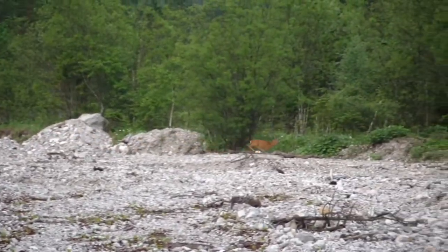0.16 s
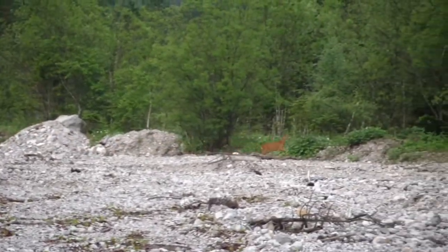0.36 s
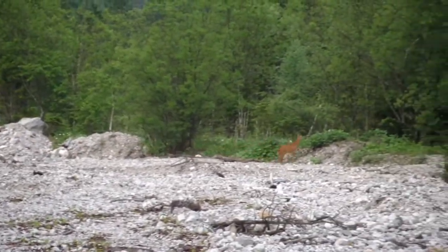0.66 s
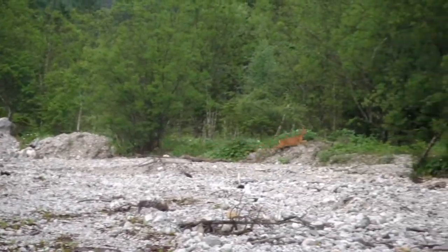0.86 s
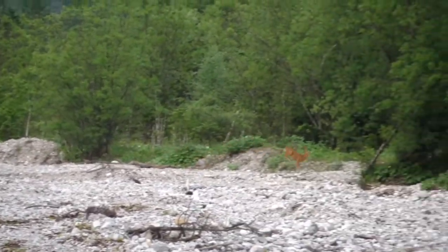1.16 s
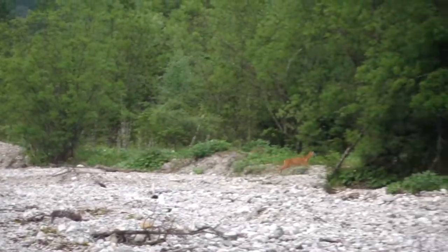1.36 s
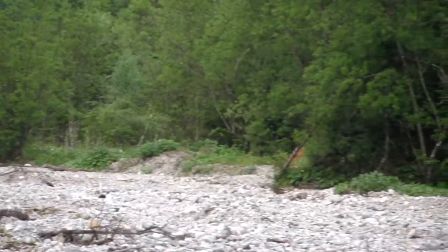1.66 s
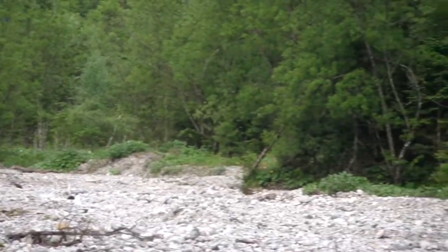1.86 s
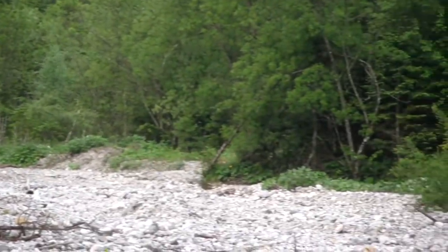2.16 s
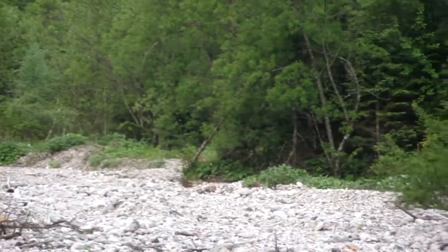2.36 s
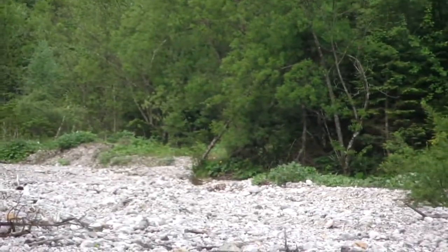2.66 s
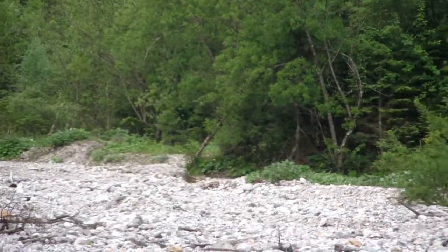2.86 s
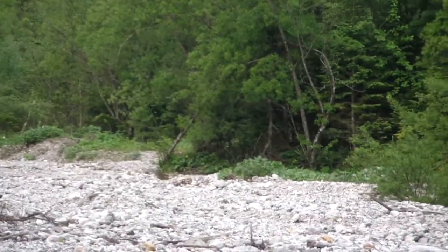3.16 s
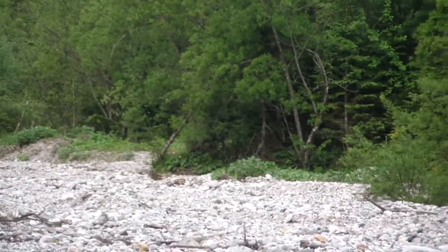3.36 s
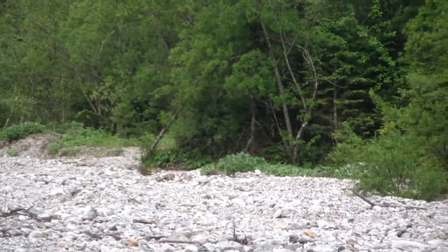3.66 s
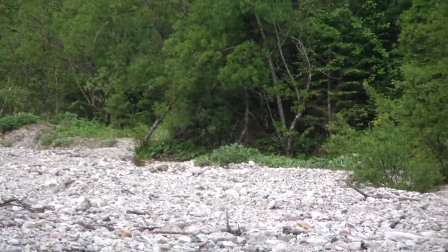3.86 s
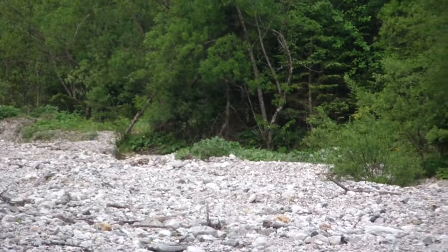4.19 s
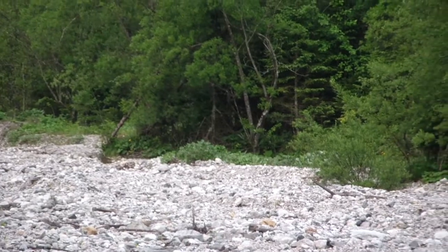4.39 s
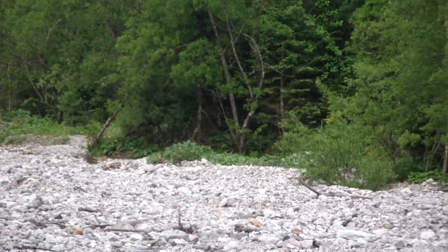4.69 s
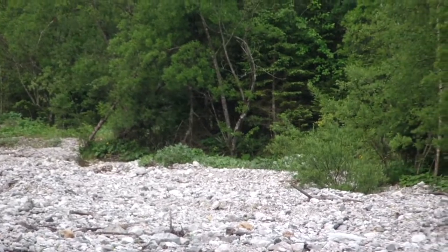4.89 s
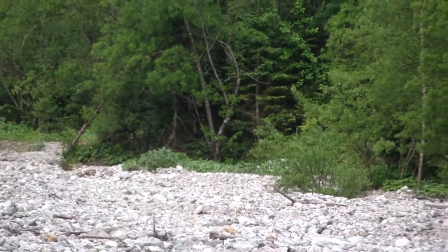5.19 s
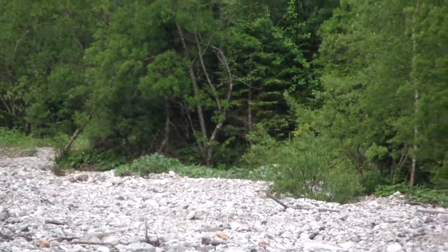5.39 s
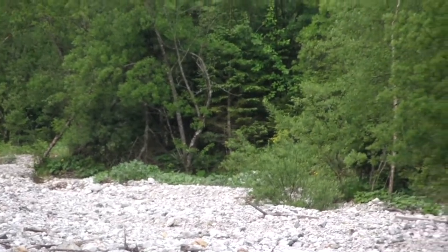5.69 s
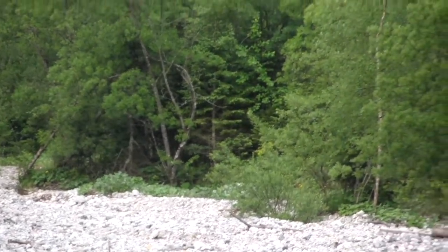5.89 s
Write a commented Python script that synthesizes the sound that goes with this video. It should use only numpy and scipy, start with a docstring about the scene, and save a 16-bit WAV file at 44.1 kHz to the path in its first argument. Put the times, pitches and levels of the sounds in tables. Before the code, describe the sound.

Outdoors by a mountain forest, a deer barks hoarsely seven times, each short cry ringing among trunks and echoing from a slope about a quarter second later. A far songbird whistles, busiest in the middle. Close to the microphone, stones tick and knock underfoot, with one very loud clack near the end. Faint airy hiss and a thin electronic whine lie beneath.

```python
"""The first of seven hoarse alarm barks: a deer flees across a gravel river bed into the forest.
Irregular vocal-fold beats and noise ring three throat resonances; noise reflections make trees and a slope's echo.
A songbird of gliding tones sings far off; close by, damped modes and bursts of grit make stones knock underfoot.
Under them lie shaped noise, a faint rush of air and hiss, and the camera's thin whine, with one soft bump."""
import sys
import numpy as np
from scipy import signal
from scipy.io import wavfile
from scipy.ndimage import uniform_filter1d

SR = 44100
rng = np.random.default_rng(int(sys.argv[2]) if len(sys.argv) > 2 else 0)


def int16_out(signal):
    """Quantize to a 16-bit WAV file."""
    q = np.round(np.clip(np.atleast_2d(signal).T, -1, 1) * 32767)
    wavfile.write(sys.argv[1], SR, q.astype(np.int16))


N = 266364
EDGE_HZ = 15850  # upper band limit of the camera


def amp(db):
    """Decibels to gain."""
    return 10 ** (np.asarray(db) / 20)


def evened(x):
    """Scales to rms 1."""
    return x / np.sqrt(np.mean(x ** 2) + 1e-20)


def read(points, hz):
    """Reads a table on a log-frequency axis."""
    f, value = np.transpose(points)
    return np.interp(np.log(hz + 1), np.log(f + 1), value)


def wavering(size, smooth):
    """Smoothed noise of rms 1, a slow random wander; smooth is the averaging length in steps."""
    return evened(uniform_filter1d(rng.standard_normal(size), size=smooth))


def add(mix, s, sound):
    """Mixes a sound in at time s, cut off at the end of the mix."""
    part = mix[..., max(round(s * SR), 0):][..., :sound.shape[-1]]
    part += sound[..., :part.shape[-1]]


def pan(db):
    """Left and right gains for a level difference."""
    return amp(np.array([[db], [-db]]) / 2)


def pair(size, same):
    """Left and right white noise with a given likeness."""
    a, b = rng.standard_normal((2, size))
    same = np.clip(same, -1, 1)
    return np.array([a, same * a + np.sqrt(1 - same ** 2) * b])


def scatter(rise, fall, same):
    """A cluster of reflections that swells and dies away (s), of mean energy 1 a channel."""
    t = np.arange(SR) / SR
    taps = pair(SR, same) * (1 - np.exp(-t / rise)) ** 2 * np.exp(-t / fall)
    return evened(taps) / np.sqrt(SR)


def through(x, response):
    """A mono sound heard through a two-channel response."""
    return signal.fftconvolve(x[None], response, axes=1)


def air(patchy_db=1.64):
    """Low rumble, far rushing and microphone hiss: shaped noise, drifting in faint patches."""
    # Colour of the air. Each row: frequency in Hz, relative density in dB per Hz.
    colour = [(20, 3.5), (70, -1), (150, -5.5), (330, -9), (550, -10.5), (1000, -13), (2000, -14.5),
              (3200, -15), (5000, -19), (9000, -22), (13500, -25), (15800, -24)]
    # How alike the two microphones hear it. Each row: frequency in Hz, left-right likeness from 0 to 1.
    likeness = [(100, 0.21), (300, 0.075), (700, 0.33), (3000, 0.14), (7000, 0.024), (15000, 0.051)]
    frames, hz = N // 256 + 5, np.fft.rfftfreq(1024, 1 / SR)
    a, b, c, d, patches = rng.standard_normal((5, frames, len(hz))).transpose(0, 2, 1)
    patches = uniform_filter1d(patches, size=12, axis=0)  # across frequency
    patches = evened(uniform_filter1d(patches, size=12, axis=1))  # across time
    same = np.clip(read(likeness, hz), -1, 1)[:, None]
    left = a + 1j * b
    right = same * left + np.sqrt(1 - same ** 2) * (c + 1j * d)
    z = np.array([left, right]) * amp(read(colour, hz)[:, None] + patchy_db * patches)
    noise = signal.istft(z, nperseg=1024, noverlap=768)[1][:, :N]
    return amp(-54.5) * evened(noise) * pan(1.2)


def camera(whine_db=-73.8, whine_hz=15650, field_hz=50, buzz=0.45, push=0.0025):
    """A thin electronic whine throbbing at the field rate, and one soft bump on the housing."""
    t = np.arange(N) / SR
    throb = 1 + buzz * np.cos(2 * np.pi * field_hz * t)
    out = amp(whine_db) * np.sqrt(2) * np.sin(2 * np.pi * whine_hz * t) * throb * pan(1.6)
    bump = amp(-23.5) * (1 - np.exp(-t / 0.00021)) * (1 - t / (5 * push)) * np.exp(-t / push)
    add(out, 1.6628, bump * amp([[-21], [0]]))  # mostly on the right microphone
    return out


def warble(notes_per_s=10, glide_octaves=0.209):
    """Soft notes at a loose pace, each of a chance pitch and slide: start s, first Hz, last Hz, dB."""
    # Phrases of soft warbling. Each row: start in seconds, end in seconds, middle pitch in Hz,
    # pitch range in octaves either way, relative level in dB.
    phrases = [(0.121, 1.32, 3386, .18, -68.5), (1.672, 2.5, 2680, .07, -63.5), (2.7, 3.0, 2906, 0.31, -62),
               (4.1, 4.3, 2557, 0.079, -60.5)]
    notes = []
    for start, end, hz, octaves, db in phrases:
        for k, (late, height, slide) in enumerate(rng.uniform(-1, 1, (32, 3))):
            s = start + (k + 0.34 * late) / notes_per_s
            middle = hz * 2 ** (octaves * height)
            glide = 2 ** (glide_octaves * slide / 2)
            if s < end:
                notes.append((s, middle / glide, middle * glide, db))
    return notes


def bird(waver_share=0.0062, note_s=.062, s_per_octave=.07):
    """Far off: sine whistles that last longer the further they glide, blurred by leaves and deep forest."""
    # Clear whistles. Each row: start in seconds, first pitch in Hz, last pitch in Hz, relative level in dB.
    whistles = [ (0.68, 3440, 2970, -63), (2.11, 6080, 5400, -66), (2.42, 2870, 3100, -55.5),
                (2.6, 4210, 3570, -58), (2.675, 4450, 4140, -57.5), (2.78, 3275, 2910, -54),
                (2.85, 2713, 2395, -55.5), (3.075, 2950, 2843, -56), (3.16, 3600, 3610, -54.5),
                (3.19, 3950, 3210, -61.5), (3.345, 2240, 2830, -59), (3.495, 3380, 3320, -51.5),
                (3.615, 3270, 2730, -55.5), (3.755, 4910, 4050, -55.5), (3.81, 3780, 3130, -55.5),
                (3.955, 3110, 3010, -55), (3.975, 3560, 3504, -53), (4.074, 3820, 3606, -55),
                (4.145, 2677, 3920, -56.5), (4.265, 2730, 3310, -54.5), (4.3, 4300, 3710, -57),
                (4.407, 3130, 3234, -55.5), (4.507, 4255, 4020, -60), (4.69, 4230, 3930, -60.5)]
    song = np.zeros(N)
    leaves = amp(-4) * scatter(rise=0.0016, fall=0.025, same=1.0)
    deep_forest = amp(-5) * scatter(rise=0.014, fall=0.42, same=0.45)
    waver = wavering(N, smooth=250)
    for s, first_hz, last_hz, db in whistles + warble():
        n = int((note_s + s_per_octave * abs(np.log2(last_hz / first_hz))) * SR)
        hz = np.linspace(first_hz, last_hz, n) * (1 + waver_share * waver[max(int(s * SR), 0):][:n])
        whistle = np.sqrt(2) * np.sin(2 * np.pi * np.cumsum(hz) / SR)
        add(song, s, amp(db) * whistle * signal.windows.tukey(n, .7))
    return (amp(-1) * song + through(song, leaves + deep_forest)[:, :N]) * pan(0.8)


def crack(hz, fall=0.0026, top_ratio=2.05):
    """Grit crushed at the contact: a few milliseconds of noise, higher for a higher-pitched stone."""
    t = np.arange(SR // 40) / SR
    grit = rng.standard_normal(len(t)) * (1 - np.exp(-t / 0.00057)) * np.exp(-t / fall)
    grit = signal.lfilter(*signal.butter(3, 0.52 * hz, "high", fs=SR), grit)
    dulled = signal.lfilter(*signal.butter(2, min(top_ratio * hz, EDGE_HZ), fs=SR), grit)
    grit = dulled + amp(-24.5) * grit  # a little treble stays
    return grit / abs(grit).max()


def stones(grit_bright=1.84):
    """Close by: knocks of a crack and heavily damped modes, each scattered by the gravel around."""
    # Stones knocking. Each row: start in seconds, peak of the ring in dB before panning, pitch in Hz,
    # peak of the gritty crack in dB against the ring, left-right difference in dB.
    knocks = [ (1.06, -51.5, 1930, 12, 6), (2.912, -38, 1270, 3, 2), (3.0860, -44, 1730, 9, 3),
              (3.456, -34.5, 3030, -1.5, 10.5), (3.893, -40, 1300, -4, 6), (3.9457, -29, 1080, -23, 2.5),
              (4.382, -42.5, 1210, -15, 4), (5.177, -36.5, 3400, -14, 4), (5.1980, -24, 1367, -13, 4.5),
              (5.2563, -8.5, 1178, -32, 2), (5.2784, -36, 1280, 3, 3.5), (5.672, -38.5, 1370, -5, 3),
              (5.807, -41, 1325, 1.5, 4), (5.8413, -37.5, 1870, 4, 5), (5.8570, -29, 2990, 1.5, 6.5),
              (5.9, -35, 1500, 6.5, 4), (5.945, -41.5, 3250, 0.5, 10), (6.034, -37, 2400, -1, 5)]
    # Modes of a stone. Each row: multiple of its pitch, relative level in dB, time to the crest in seconds.
    modes = [(.77, -9, 0.00087), (1, 7.5, 0.00068), (1.16, -8.5, 0.00075), (1.52, -8, 0.0014),
             (1.72, -6, 0.00038), (2.1, -36, 0.0036), (2.9, -10.5, 0.0012), (3.4, -33, 0.0039),
             (4.4, -14.5, 0.00021), (5.4, -32, 0.00091), (6.7, -27.5, 0.0012), (9, -32, 0.0009)]
    out, t = np.zeros((2, N)), np.arange(SR // 40) / SR
    for s, db, hz, crack_db, side_db in knocks:
        # a crack louder than the ring also brightens the ring (dB per octave)
        bright_db = grit_bright * max(crack_db, 0)
        ring = np.zeros(len(t))
        for ratio, level, crest in modes:
            if hz * ratio < EDGE_HZ:
                swell = t / crest * np.exp(-t / crest)
                ring += amp(level + bright_db * np.log2(ratio)) * swell * np.sin(2 * np.pi * hz * ratio * t)
        # a small stone radiates little bass
        ring = signal.lfilter(*signal.butter(3, 0.71 * hz, "high", fs=SR), ring)
        thud = amp(-17) * np.sin(2 * np.pi * 130 * t) * np.exp(-t / 0.0012)  # the ground takes the blow
        knock = amp(db) * (ring / abs(ring).max() + amp(crack_db) * crack(hz) + thud)
        heard = amp(-13) * through(knock, scatter(rise=.0005, fall=.003, same=.4))
        heard += amp(-23) * through(knock, scatter(rise=0.003, fall=0.011, same=0.52))
        add(heard, 0, knock)
        add(out, s, heard * pan(side_db))
    return out


def forest():
    """Reflections from countless trunks, as noise with each band dying at its own speed."""
    # The ringing trees. Each row: frequency in Hz, time to fall 60 dB in seconds, relative level in dB.
    trunks = np.array([(200, 0.66, -3), (564, 4.4, -1.5), (950, 1.4, 2), (1330, 1.75, -0.5),
                       (2110, 1.26, 1), (4000, 1.46, -2.5)])
    hz, t, z = signal.stft(pair(2 * SR, same=0.96), SR, nperseg=256)
    t60 = read(trunks[:, [0, 1]], hz)[:, None]
    colour_db = read(trunks[:, [0, 2]], hz)[:, None]
    tail = signal.istft(z * amp(colour_db - 60 * t / t60), SR, nperseg=256)[1]
    return tail / np.linalg.norm(tail[0])


def folds_and_breath(size, pitch_hz=170, jitter=.22, rough=0.75):
    """Irregular beats of the vocal folds, mixed with the blast of air that they chop into puffs."""
    turns = np.cumsum(pitch_hz * (1 + jitter * wavering(size, smooth=200))) / SR
    folds = sum(np.cos(2 * np.pi * k * turns) for k in range(1, 22))
    puffs = (0.097 + np.exp(-(turns % 1) / 0.86)) * rng.standard_normal(size)
    return (1 - rough) * evened(folds) + rough * evened(puffs)


def bark(rise, formants, lift_db, spread, bright_db, rasp_db, jaw, hold=0.031):
    """The folds and breath ring the long throat, whose resonances tremble and move as the jaw drops."""
    # The three moving resonances. Each row: width in Hz before spreading, level in dB before lifts.
    throat = [(145, -5.5), (170, -2), (330, -5.5)]
    # Broad rasp under them. Each row: frequency in Hz, level in dB before the strain.
    rasp = [(80, -22), (180, -15.5), (330, -29), (900, -18.5), (1600, -14.5), (1800, -13), (2100, -13),
            (2450, -8), (2800, -14.5), (3150, -26), (4500, -32), (9000, -66)]
    t = np.arange(SR // 3) / SR
    hz, at, z = signal.stft(folds_and_breath(len(t)), SR, nperseg=1024, noverlap=896)
    hz = hz[:, None]
    opening = np.minimum(at / (rise + hold), 1) - .7
    tremble = 1 + 0.018 * wavering(len(at), smooth=8)
    # a dropping jaw brings out the first resonance; it loses as the second comes out
    lifts_db = (6 * jaw - 0.32 * lift_db, lift_db, 0)
    power = amp(read(rasp, hz) + rasp_db) ** 2
    for k, (centre, (width, db)) in enumerate(zip(formants, throat), 1):
        # the jaw moves the lowest resonance most
        offset = hz - centre * tremble * (1 + jaw * opening / k ** 2)
        resonance = 1 / (1 + (offset / (width * spread)) ** 2) ** 3
        power = power + amp(db + lifts_db[k - 1]) ** 2 * resonance
    tilt = amp(bright_db * np.log2(np.maximum(hz, formants[0]) / formants[1]))
    voice = signal.istft(z * np.sqrt(power) * tilt, SR, nperseg=1024, noverlap=896)[1][:len(t)]
    swell = np.sin(np.pi / 2 * np.minimum(t / rise, 1))
    # a bark that swells slowly also dies slowly
    decay = np.exp(-np.maximum(t - rise - hold, 0) / (0.71 * rise))
    return evened(voice) * swell * decay


def deer():
    """Each bark comes straight, off the nearest trees, from the deep forest, and late from the slope."""
    # The barks. Each row: start in seconds, rise in seconds, effort as a relative level in dB,
    # second throat resonance in Hz, strain from 0 to 1, jaw drop as a share by which the first
    # resonance rises, relative level of the slope's echo in dB.
    barks = [ (0.012, 0.027, -53.5, 1168, .05, 0.097, -11.5), (1.608, 0.033, -48, 1252, 0.3, .0, -13.5),
             (2.500, 0.037, -48.5, 1268, 0.45, 0.1, 4.5), (3.458, 0.038, -44.5, 1303, 0.94, 0.13, -2),
             (4.545, 0.071, -45, 1345, 1.0, .3, -1.5), (5.395, 0.043, -52, 1294, .45, 0.025, -5.5),
             (5.915, 0.033, -47.7, 1210, 0.7, 0.13, 1)]
    out = np.zeros((2, N))
    for s, rise, db, hz, strain, jaw, echo_db in barks:
        call = amp(db) * bark(
            rise,
            formants=(0.37 * hz * (1 + jaw), hz, 1.65 * hz),
            lift_db=-6 + 10 * strain,  # strain brings out the second resonance
            spread=0.15 + 11.7 * rise,  # a slower bark has wider resonances
            bright_db=1.06 - 2.2 * strain,  # strain darkens the bark (dB per octave)
            rasp_db=-6.5 + 8.5 * strain,  # and brings out the rasp
            jaw=jaw)
        add(out, s, call)
        add(out, s, amp(-13.5) * through(call, scatter(rise=0.0021, fall=0.16, same=0.32)))
        # the forest answers more when the slope does
        add(out, s, amp(-0.5 + 0.38 * echo_db) * through(call, forest()))
        dulled = signal.lfilter(*signal.butter(1, 2000, fs=SR), call)  # the long path takes treble away
        slope = scatter(rise=0.0045, fall=0.068, same=1.0)
        slope += amp(-2) * scatter(rise=0.051, fall=0.38, same=1.0)
        echo_s = .255 + .013 * s  # the echo comes later as the deer runs
        add(out, s + echo_s, amp(echo_db) * through(dulled, slope))
    return out * pan(2.1)


def scene():
    """Outside sounds reach the left microphone a sample late; air and camera are added undelayed."""
    left, right = deer() + stones() + bird()
    return np.array([np.roll(left, 1), right]) + air() + camera()


def record(dry):
    """The camera's band limit: a steep low-pass."""
    low_pass = signal.firwin(1023, EDGE_HZ, window=("kaiser", 8), fs=SR)
    return signal.oaconvolve(dry, low_pass[None], "same")


dry = scene()
out = record(dry)
int16_out(out)
```